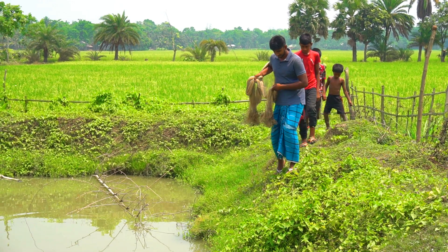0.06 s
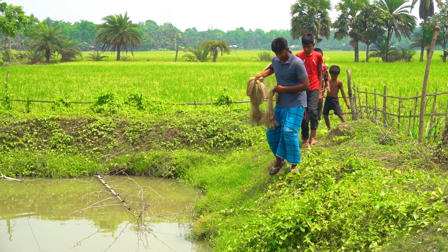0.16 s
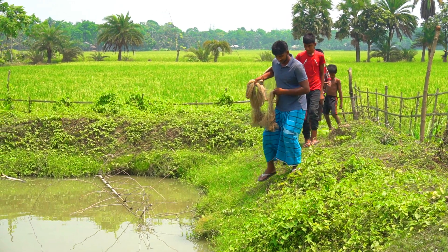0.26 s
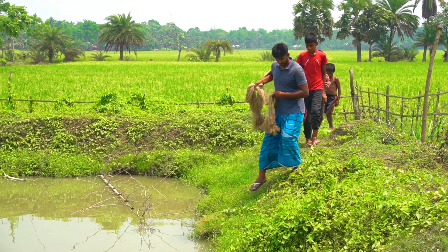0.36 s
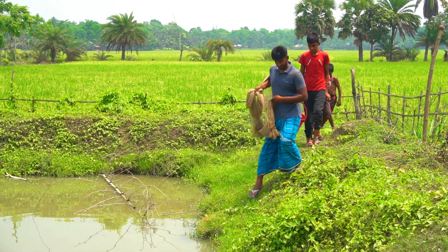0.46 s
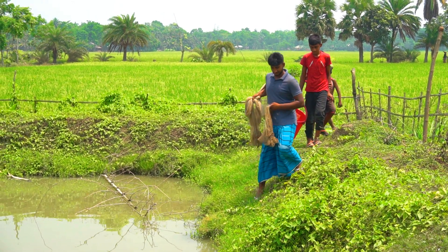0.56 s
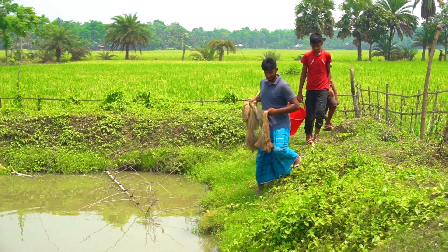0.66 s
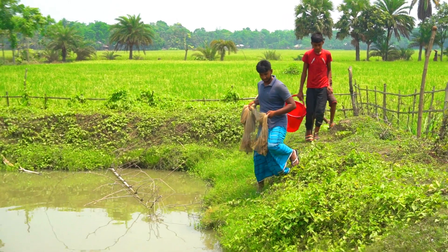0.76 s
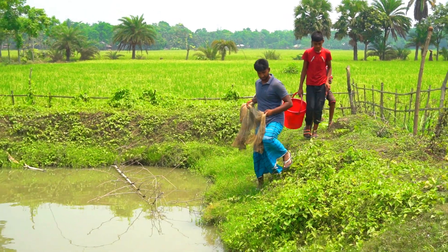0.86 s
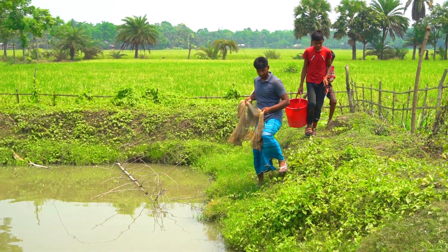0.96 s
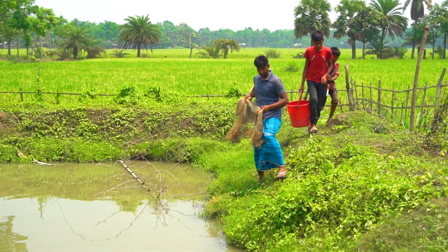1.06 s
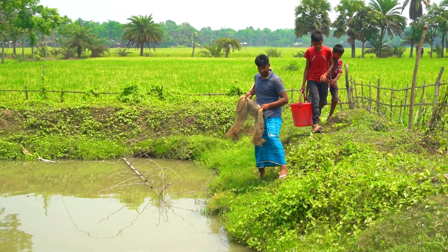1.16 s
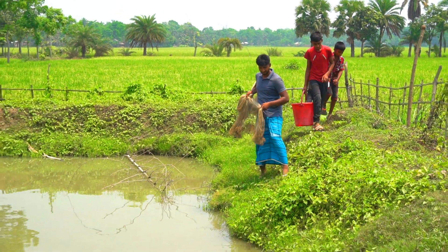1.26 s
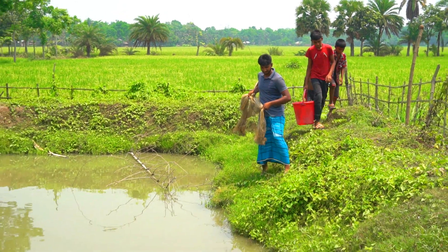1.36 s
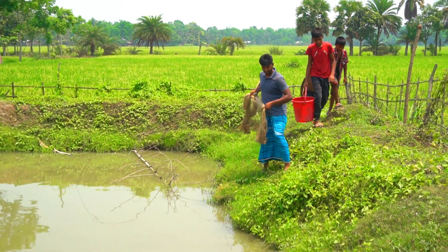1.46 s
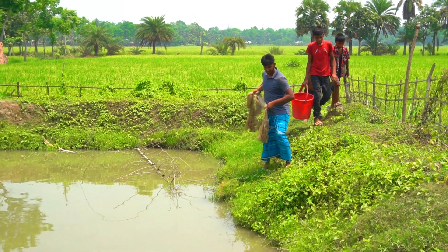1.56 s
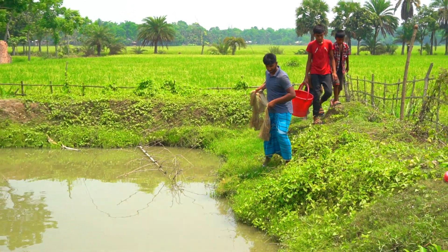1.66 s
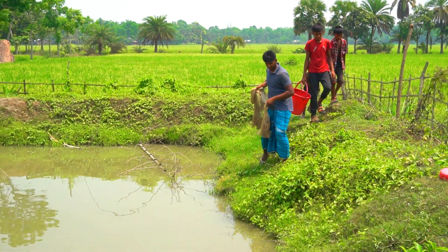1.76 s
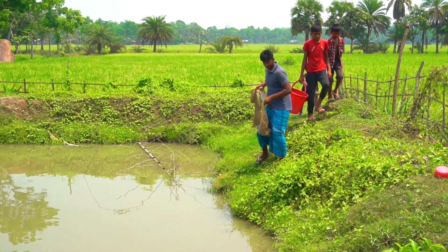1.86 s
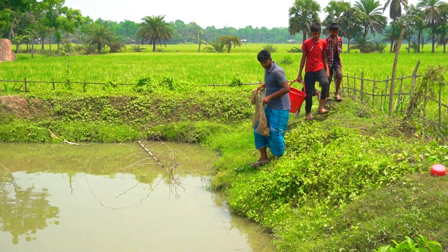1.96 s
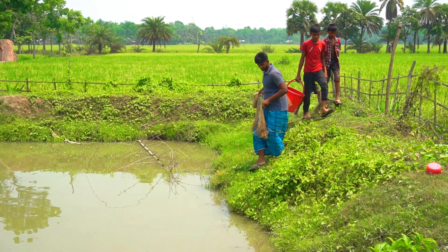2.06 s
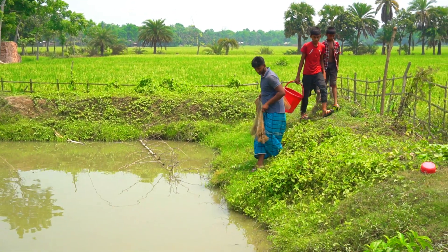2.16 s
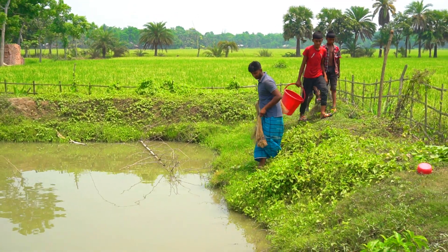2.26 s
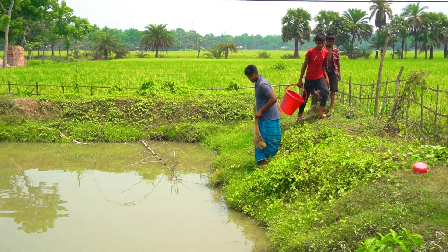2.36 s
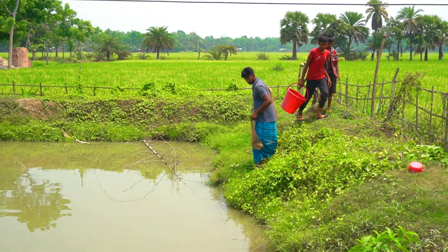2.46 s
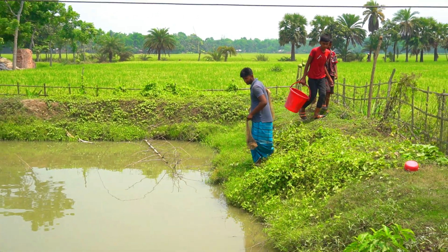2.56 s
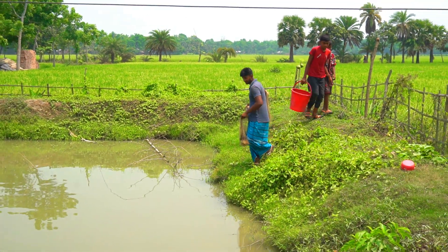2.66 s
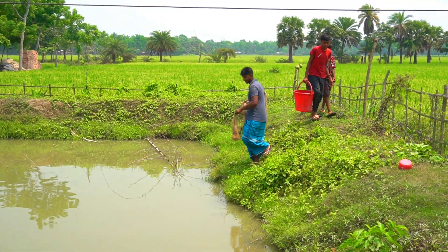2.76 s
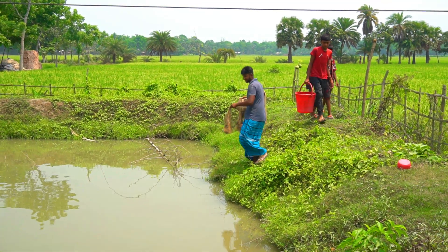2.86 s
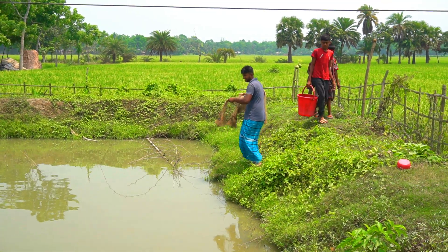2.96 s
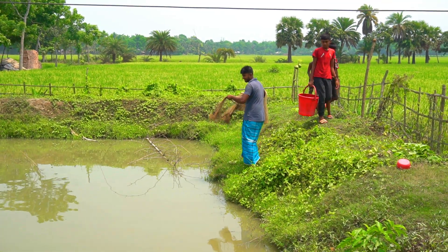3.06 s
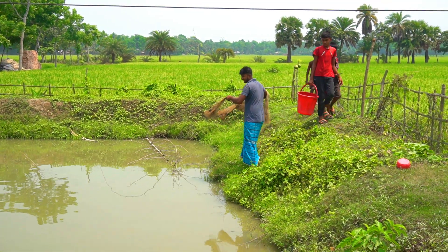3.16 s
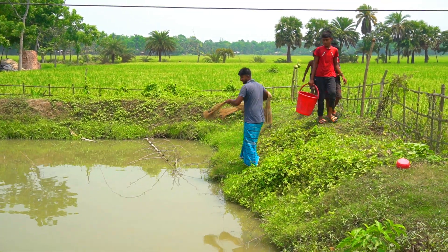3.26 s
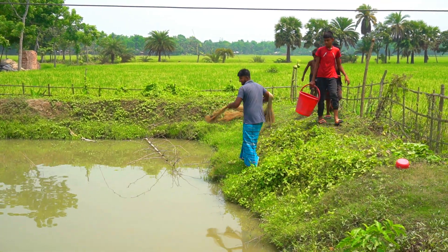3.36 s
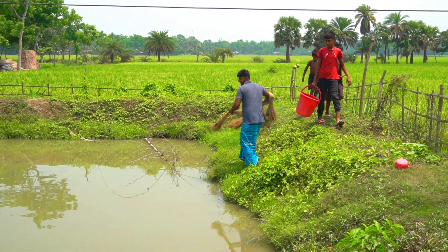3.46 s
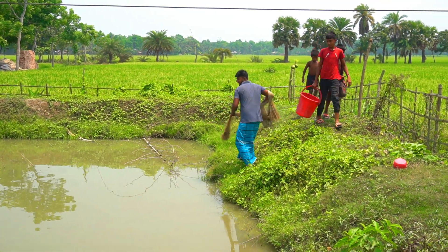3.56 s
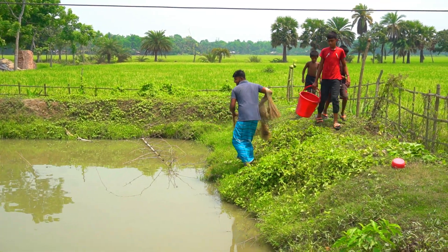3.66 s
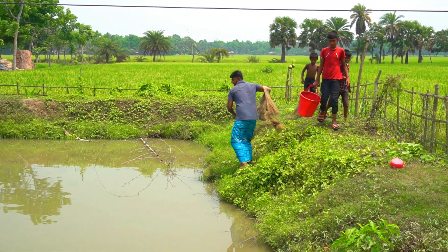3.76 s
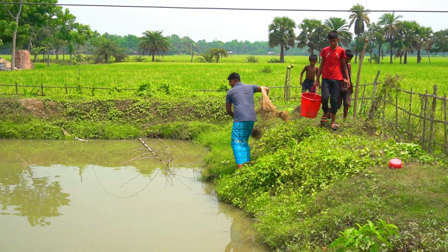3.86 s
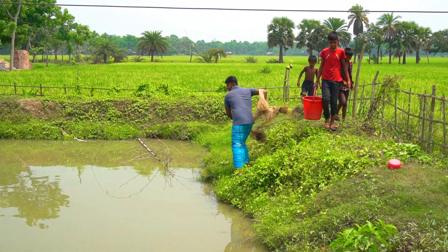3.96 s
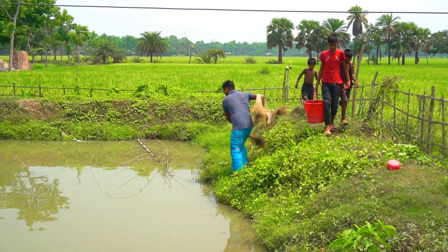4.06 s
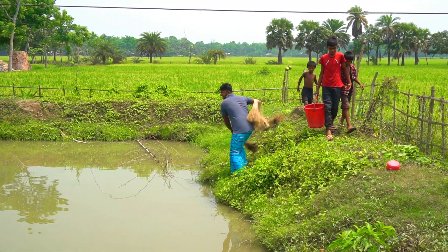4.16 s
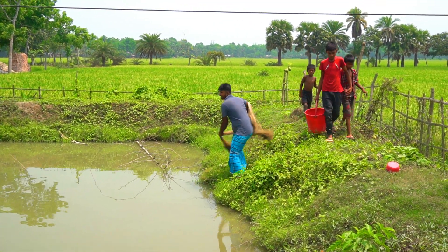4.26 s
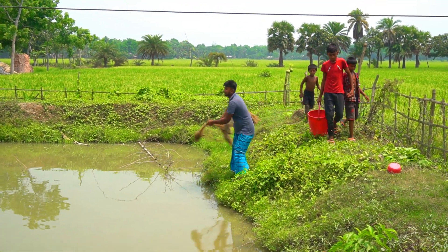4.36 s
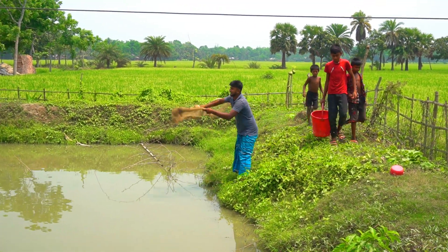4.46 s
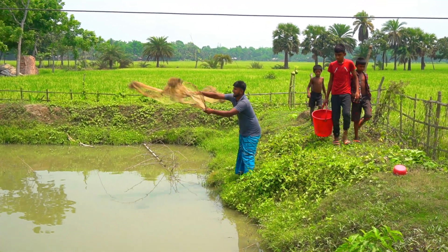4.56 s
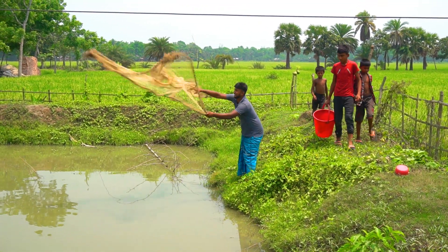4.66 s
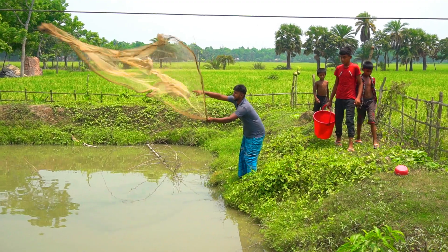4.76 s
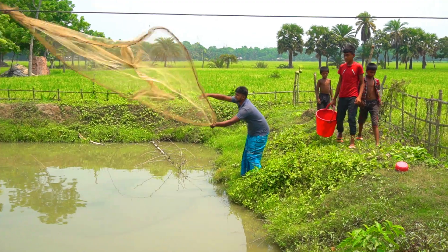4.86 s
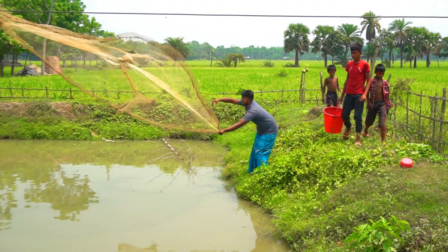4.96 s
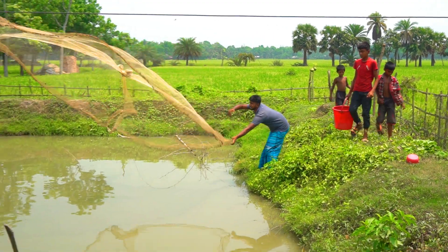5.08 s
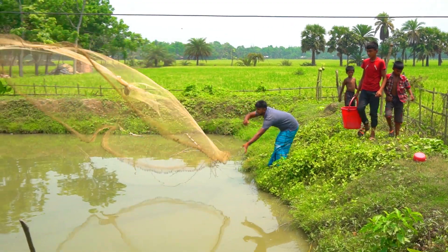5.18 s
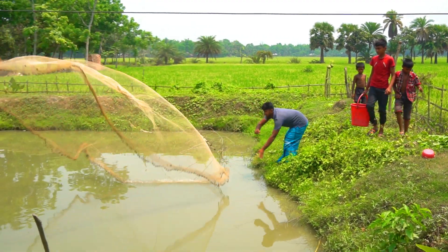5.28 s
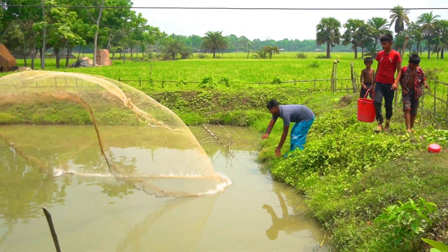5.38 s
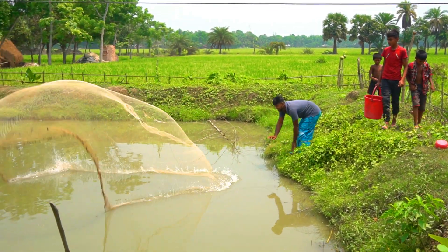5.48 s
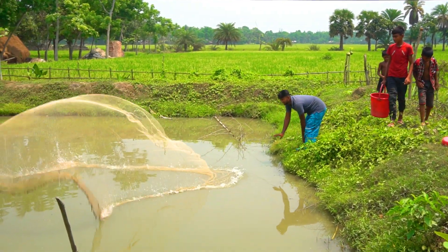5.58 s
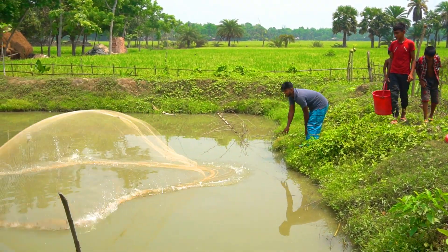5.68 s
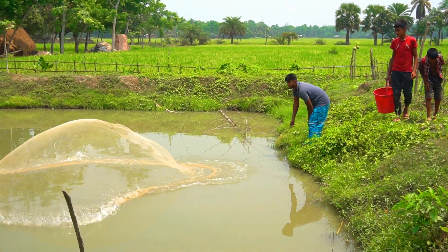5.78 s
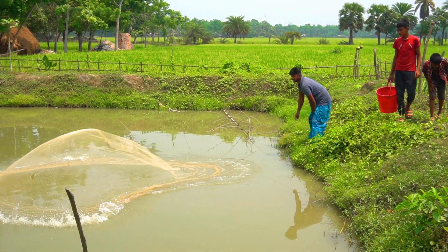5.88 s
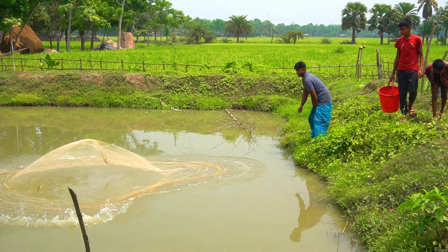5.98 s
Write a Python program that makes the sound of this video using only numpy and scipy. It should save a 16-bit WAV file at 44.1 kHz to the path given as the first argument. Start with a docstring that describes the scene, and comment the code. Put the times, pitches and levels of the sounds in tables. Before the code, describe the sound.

Quiet open air with a low gust fading to breeze and a thin, restless high hiss until about 3.7 s. From 0 to 1.5 s the hand-held camera's grip creaks and clicks close by; a clear bird whistle slides down around 0.3-0.6 s. Soft grass rustles, scuffs and faint sinker ticks follow, with a stronger rustle at 1.95 and a sharp dry snap at 2.02 s, echoed by smaller ones. Distant wavering bird notes come at 2.5-3.1 s. From 3.6 s another bird repeats rising pips four times a second, growing louder. The net bundle jerks at 3.8 s, a snap sounds at 4.35, then mesh hisses outward from 4.5 with bright ticks and more creaks until about 5.1. At 5.3 s the rim skims the water, then lands until 5.8 in rushing splatter, slaps, gurgling plops and spray. Smaller bubbles and falling drops fade quickly.

```python
"""A hand-held camera's grip creaks and a bird whistles, as a fisherman walks through grass to a pond.
Stalks or cord snap, then he swings a weighted cast net and throws it: filtered, crackling noise hisses
for the mesh and tiny puffs tick for the sinkers. The rim lands with noise slaps and spray, and with
ringing sine bubbles for the plops. Gliding sine notes are birds; soft noise is air, breeze and a high band."""
import sys
import numpy as np
from scipy import signal
from scipy.fft import rfft, irfft, next_fast_len
from scipy.io import wavfile
from scipy.ndimage import uniform_filter1d

SR = 44100
rng = np.random.default_rng(int(sys.argv[2]) if len(sys.argv) > 2 else 0)


def digitize_waveform(pressure):
    """Quantize a signal to 16-bit integers and store it at the path in sys.argv[1].

    Rows of a 2-D input are taken as channels; values are limited to [-1, 1].
    """
    field = np.atleast_2d(pressure).T
    bounded = np.clip(field, -1, 1)
    quanta = np.round(bounded * 32767).astype(np.int16)
    wavfile.write(sys.argv[1], SR, quanta)


N = 265658  # length in samples
T = np.arange(N) / SR  # time in seconds

# The rim lands from its first sinker (LAND) to its last (CLOSE); then the water calms.
LAND_S, CLOSE_S, LAND_ATTACK_S, CALM_DB_PER_S = 5.364, 5.814, 0.02, 97
SURGE_FALL_DB_PER_S = 302
# Whole stretches of the rim going in together. Each row: start in seconds, hold in seconds,
# splatter level in dB, spray level in dB, both against the steady landing.
SURGES = [(5.363, .004, 0.5, -21), (5.438, 0.014, -1, 3.5), (5.498, 0.098, -1, -5),
          (5.715, 0.019, -2.5, 0.5), (5.776, 0.0065, 3.5, -3.5), (5.876, 0.0056, -4, -13)]


def landing(axis):
    """How much water the rim throws up: steady while it lands, with surges (axis 0 splatter, 1 spray)."""
    steady = swell(LAND_S, CLOSE_S - LAND_S - LAND_ATTACK_S, 0, LAND_ATTACK_S, CALM_DB_PER_S)
    surges = [swell(s, hold, db[axis], LAND_ATTACK_S, SURGE_FALL_DB_PER_S) for s, hold, *db in SURGES]
    return together([steady] + surges)


# The near edge skims the surface first; levels are against the steady landing.
TOUCH_S, TOUCH_DB, SKIM_SPLATTER_DB = 5.303, -8.5, -11.5
# Drops falling back, against the steady landing; the spray is quieter again by its own dB.
SETTLE_DB, SETTLE_SPRAY_DB, SETTLE_FALL_DB_PER_S = -8, -7, 15
SPLATTER_DB, SPRAY_DB, THUMP_DB = -35.5, -37, -68.5
# Colour of the coarse splatter. Each row: frequency in Hz, level in dB.
SPLATTER_COLOUR = [(60, -29), (170, -27), (330, -19), (600, -16.5), (1100, 1.5), (1550, 6.5), (1850, 2),
                   (2300, 6), (3500, -2.5), (5000, -17), (9000, -47)]
# Colour of the fine spray. Each row: frequency in Hz, level in dB.
SPRAY_COLOUR = [(1500, -24), (3500, 0.5), (6000, 0), (9000, -4), (12000, -7.5), (16000, -11)]


def splash():
    """The rim lands stretch by stretch: plops, coarse splatter, a low thump and a fizz of fine spray."""
    hiss, impact = noise(POND, lead=0.48), landing(axis=0)
    settle = swell(CLOSE_S, 0, SETTLE_DB, LAND_ATTACK_S, SETTLE_FALL_DB_PER_S)
    skim = swell(TOUCH_S, 0, TOUCH_DB, attack_s=0.033, fall_db_per_s=56)
    churn = together([impact, settle, gain_of(SKIM_SPLATTER_DB) * skim])
    mist = together([landing(axis=1), skim, gain_of(SETTLE_SPRAY_DB) * settle])
    out = plops(impact, churn)
    splatter = coloured(crackle(hiss, per_s=1000, spread_db=2, life=0.0021), SPLATTER_COLOUR)
    out += gain_of(SPLATTER_DB) * churn * splatter
    fizz = patchy(noise(POND, lead=0.28), depth_db=1.5)
    spray = coloured(crackle(fizz, per_s=3500, spread_db=1.1, life=0.0014), SPRAY_COLOUR)
    out += panned(1.8) * gain_of(SPRAY_DB) * mist * spray
    out += gain_of(THUMP_DB) * impact * evened(band(hiss, 58, 150))
    return out


# Stretches of the weighted rim slapping down. Each row: start in seconds, relative level in dB,
# starting pitch of the air cavity in Hz.
SLAPS = [(5.379, -23, 1330), (5.448, -12.5, 808), (5.55, -12.5, 1580), (5.67, -15, 765), (5.684, -29, 750),
         (5.728, -13.5, 739), (5.768, -15, 823), (5.797, -11, 764), (5.803, -14, 868)]


def slaps():
    """Each stretch of rim hits the water with a puff of noise and a ringing air cavity."""
    hiss, out = noise(POND, lead=0.48), np.zeros((2, N))
    for s, db, hz in SLAPS:
        puff = burst(hiss, s + .3, life=0.027, rise=0.0014)
        add(out, s, gain_of(db - 15.5) * peaked(band(puff, 630, 2700)))
        add(out, s, gain_of(db - 7.5) * panned(0.62) * bubble(hz, cycles=7.7, climb=0.0133))
    return out


# The typical pocket pitch sags while the rim lands and rises afterwards.
POCKET_HZ, POCKET_SAG_HZ_PER_S, POCKET_RISE_HZ_PER_S = 834, 329, 1900
POCKET_DB, POCKET_GROWTH_DB_PER_S, POCKET_FALL_DB_PER_S = -38.5, 8.5, 54
# The largest pockets; the ratio is against the typical pitch.
GULP_RATIO, GULP_DB, GULP_GROWTH_DB_PER_S = .63, -58.5, 21
SMALL_BUBBLES_DB = -41


def plops(impact, churn):
    """Sinkers drag air under: pockets gurgle around one pitch, and smaller bubbles outlast them."""
    during, after = np.clip(T, LAND_S, CLOSE_S) - LAND_S, np.maximum(T - CLOSE_S, 0)
    hz = POCKET_HZ - POCKET_SAG_HZ_PER_S * during + POCKET_RISE_HZ_PER_S * after
    plunge = impact * gain_of(-POCKET_FALL_DB_PER_S * after)
    pocket_gain = gain_of(POCKET_DB + POCKET_GROWTH_DB_PER_S * during)
    pockets = pocket_gain * bubbles(hz, scatter=.165, cycles=5, count=560)
    gulp_gain = gain_of(GULP_DB + GULP_GROWTH_DB_PER_S * during)
    gulps = gulp_gain * bubbles(GULP_RATIO * hz, scatter=0.175, cycles=4.6, count=120)
    small = gain_of(SMALL_BUBBLES_DB) * bubbles(2.5 * hz, scatter=.36, cycles=9.3, count=700)
    return plunge * (pockets + gulps) + churn * small


def bubbles(typical_hz, scatter, cycles, count):
    """A cloud of bubbles of random size, level and side, from first touch to the end; level evened out."""
    out = np.zeros((2, N))
    for k, (size, loud, side) in enumerate(rng.standard_normal((count, 3))):
        at = np.interp((k + rng.random()) / count, [0, 1], [TOUCH_S, T[-1]])
        hz = np.interp(at, T, typical_hz) * np.exp(scatter * size)
        one = bubble(hz, cycles, climb=0.018)
        add(out, at, gain_of(5.8 * loud) * panned(4.0 * side) * one)
    power = uniform_filter1d((out ** 2).mean(0), size=1500)
    return out / np.sqrt(abs(power) + 1e-6)


def bubble(hz, cycles, climb, size=3000):
    """A trapped air pocket rings for some cycles and climbs in pitch as it nears the surface."""
    turns = hz * np.arange(size) / SR
    age = turns / cycles
    tone = np.sin(2 * np.pi * turns * (1 + climb * np.minimum(age, 4)))
    return tone * np.exp(-age) * (1 - np.exp(-turns * 2))


# The backswing jerks the bundled net once.
SWING_S, SWING_DB, SWING_ATTACK_S, SWING_FALL_DB_PER_S = 3.762, -44, 0.02, 152
# Colour of the bundled net on the backswing. Each row: frequency in Hz, level in dB.
SWING_COLOUR = [(450, -27), (1100, -20), (2600, -0.5), (4000, -8), (7600, -9), (16000, -15.5)]
SWISH_ATTACK_S = 0.028
# The mesh is shaken out, swung, then runs through the air.
# Each row: start in seconds, hold in seconds, relative level in dB, fall in dB per second.
SWISHES = [(2.796, 0.014, -66, 80), (3.05, .15, -71.5, 67), (3.213, 0.064, -65.5, 160),
           (4.015, 0.13, -64, 80), (4.228, 0.1, -57, 61), (4.488, 0.035, -58.5, 100),
           (4.604, .32, -50.5, 60)]
# Colour of the mesh in the air. Each row: frequency in Hz, level in dB.
FLIGHT_COLOUR = [(800, -17.5), (1500, 2), (3500, -2.5), (5500, 1.5), (9000, 6), (13000, 2.5), (16000, -3)]


def net():
    """The bundled mesh is jerked back, then its many threads hiss through the air."""
    hiss = patchy(noise(NEAR), depth_db=1.8)
    bundle = crackle(hiss, per_s=2000, spread_db=3, life=.002)
    threads = crackle(hiss, per_s=2600, spread_db=3, life=.001)
    jerk = swell(SWING_S, 0, SWING_DB, SWING_ATTACK_S, SWING_FALL_DB_PER_S)
    mesh = together(swell(s, hold, db, SWISH_ATTACK_S, fall) for s, hold, db, fall in SWISHES)
    out = panned(-4) * jerk * coloured(bundle, SWING_COLOUR)
    return out + gain_of(1.5) * mesh * coloured(threads, FLIGHT_COLOUR)


# Sinkers ticking together. Each row: start in seconds, relative level in dB.
TICKS = [(0.851, -40.5), (1.4458, -45), (1.568, -41.5), (1.702, -46.5), (1.84, -42), (2.3472, -36.5),
         (4.2366, -31.5), (4.271, -31.5), (4.6115, -22.5), (4.6757, -27), (4.6874, -25.5), (4.7815, -26.5),
         (4.8393, -26.5), (4.907, -37), (4.92, -25), (4.9552, -27.5)]


def sinkers():
    """Small weights knock together: very short, bright puffs, each with a fainter, longer tail."""
    hiss, out = patchy(noise(NEAR), depth_db=1.8), np.zeros((2, N))
    for s, db in TICKS:
        tick = burst(hiss, s, life=.001) + .13 * burst(hiss, s + .1, life=.014)
        add(out, s, gain_of(db - 2.5) * panned(-.8) * peaked(band(tick, 6340, 13900)))
    return out


STRIDE_ATTACK_S, STRIDE_FALL_DB_PER_S = 0.1, 53
# Strides through the grass. Each row: start in seconds, hold in seconds, level in dB.
STRIDES = [(.54, 0.2, -63), (1.203, .25, -64.5), (1.797, .05, -64.5), (1.938, 0.057, -50.5),
           (2.188, 0.025, -56)]
WALK_S, WALK_DB = 2.94, -71  # a faint rustle lasts as long as the walk
# Colour of grass brushed by legs. Each row: frequency in Hz, level in dB.
RUSTLE_COLOUR = [(450, -7.5), (760, -1.5), (1400, -4.5), (2200, 5), (3200, 2), (4300, 0), (5500, -0.5),
                 (10000, -2), (16000, -10)]
BRUSH_ATTACK_S, BRUSH_FALL_DB_PER_S = .06, 100
# Cloth sliding past tall leaves. Each row: start in seconds, level in dB.
BRUSHES = [(1.27, -54), (1.485, -52)]


def grass():
    """Legs and cloth brush the grass: noise broken into many tiny contacts with the blades."""
    blades = crackle(patchy(noise(NEAR), depth_db=1.8), per_s=2000, spread_db=3, life=.002)
    steps = STRIDES + [(0.0098, WALK_S, WALK_DB)]
    legs = together(swell(*row, STRIDE_ATTACK_S, STRIDE_FALL_DB_PER_S) for row in steps)
    cloth = together(swell(s, 0, db, BRUSH_ATTACK_S, BRUSH_FALL_DB_PER_S) for s, db in BRUSHES)
    out = panned(-1.44) * legs * coloured(blades, RUSTLE_COLOUR)
    return out + cloth * evened(band(blades, 1870, 3420))


# Soft scuffs on the bank. Each row: start in seconds, relative level in dB, centre frequency in Hz.
SCUFFS = [(1.236, -40.5, 910), (1.721, -40.5, 1350), (1.836, -40, 1040), (2.333, -43, 695),
          (2.414, -44.5, 720), (2.457, -45.5, 393), (2.488, -43.5, 636), (2.524, -54.5, 594),
          (2.567, -53.5, 420), (2.636, -39.5, 766), (2.763, -46.5, 1060), (2.833, -49, 716),
          (3.017, -41, 1420)]


def scuffs():
    """Feet press grass and soft earth: dull, grainy puffs."""
    hiss, out = crackle(noise(NEAR), per_s=700, spread_db=3.5, life=0.0021), np.zeros((2, N))
    for s, db, hz in SCUFFS:
        puff = band(burst(hiss, s, life=0.03, rise=0.00079), hz * 0.38, hz * 2.05, order=3)
        add(out, s, gain_of(db - 2.5) * peaked(puff))
    return out


# Dry snaps of stalks and cord. Each row: start in seconds, relative level in dB.
SNAPS = [(1.963, -37), (2.0208, -17), (2.077, -27.5), (2.119, -36.5), (3.189, -46), (4.354, -27)]
# Colour of the snaps. Each row: frequency in Hz, level in dB.
SNAP_COLOUR = [(200, -38), (480, -21), (750, 6.5), (1400, 2), (2300, 7.5), (3700, -3), (6000, -7.5),
               (16000, -19.5)]


def snaps():
    """Short, broad cracks with a brief rustle behind each."""
    hiss, out = coloured(noise(NEAR), SNAP_COLOUR), np.zeros((2, N))
    for s, db in SNAPS:
        crack = burst(hiss, s, life=0.0021, rise=0.0013) + 0.06 * burst(hiss, s + .1, life=0.015)
        add(out, s, gain_of(db - 2.0) * panned(-1.8) * peaked(crack))
    return out


# Creaks of the grip. Each row: start in seconds, relative level in dB, low ring against high in dB
# (before a trim).
CREAKS = [(0.059, -48, 15), (0.116, -42.5, 4), (0.172, -46.5, 4), (0.227, -33.5, 3.5), (0.299, -43.5, 16),
          (0.545, -33.5, -25), (0.569, -38, -6), (0.628, -37, -5), (0.67, -33.5, -14), (0.689, -34, -6),
          (0.706, -35, -21), (0.751, -32.5, 2), (0.779, -36, -8), (0.837, -36.5, 21), (0.891, -43, 15),
          (0.932, -38.5, -1), (0.945, -39, -17), (0.97, -38, -3), (1.051, -43, -14), (1.406, -34.5, -17),
          (1.503, -37, -25), (4.399, -41.5, -31), (4.443, -46, -3), (4.79, -24.5, -18.5), (4.813, -36, -12),
          (4.861, -33.5, -16), (4.928, -33.5, -30), (5.049, -31, -35), (5.068, -39, -31)]
# Low ringing pitches of the camera shell. Each row: frequency in Hz, level in dB,
# time to fall by 60 dB in seconds.
SHELL_LOW = [(640, -9, 0.0055), (898, 13, 0.023), (1020, -3, 0.074)]
# High ringing pitches of the camera shell. Each row: frequency in Hz, level in dB,
# time to fall by 60 dB in seconds.
SHELL_HIGH = [(1343, 2.5, 0.027), (1990, 11, 0.026), (2088, 5, 0.023), (2360, -25, 0.0054)]
# Colour of the fine creaking. Each row: frequency in Hz, level in dB.
STRAIN_COLOUR = [(100, -24), (280, -6), (520, -4), (720, 4.5), (900, 6), (1190, -2.5), (1430, 1),
                 (1720, -4.5), (2010, 3.5), (2650, -7), (3100, -15), (6000, -18.5), (12000, -76)]


def grip():
    """Stick and slip of the grip: single slips ring the shell, over a fine creaking."""
    hiss, out = noise(NEAR, lead=0.63), np.zeros((2, N))
    for s, db, low_db in CREAKS:
        push = burst(hiss, s, life=.0022) + .06 * burst(hiss, s + .1, life=.008)
        body = peaked(ring(push, SHELL_HIGH) + gain_of(low_db + 6.0) * ring(push, SHELL_LOW))
        add(out, s, gain_of(db + 1) * panned(-4.0) * peaked(band(body, 300, 2840, order=3)))
    fine = coloured(crackle(hiss, per_s=420, spread_db=3.8, life=.0024), STRAIN_COLOUR)
    return out + gain_of(-2.5) * panned(-2.0) * fine * strain()


def ring(push, modes):
    """Rings a set of modes, each slightly and randomly detuned at every blow."""
    t = np.arange(push.shape[1]) / SR
    answer = np.zeros(len(t))
    for hz, db, t60 in modes:
        answer += gain_of(db - 60 * t / t60) * np.cos(2 * np.pi * hz * rng.normal(1, .03) * t)
    return peaked(signal.fftconvolve(push, answer[None], axes=1)[:, :len(t)])


STRAIN_ATTACK_S, STRAIN_FALL_DB_PER_S = 0.038, 75
# Spells when the grip is under strain. Each row: start in seconds, hold in seconds, relative level in dB.
STRAINS = [(0.0, 0.14, -57), (0.162, 0.46, -52), (0.54, 0.41, -48), (1.248, 0.26, -50.5),
           (2.03, 0.042, -55), (4.336, 0.028, -60), (4.748, 0.31, -47.5)]


def strain():
    """How hard the grip is strained; drives its fine creaking and the handling rumble."""
    return together(swell(*row, STRAIN_ATTACK_S, STRAIN_FALL_DB_PER_S) for row in STRAINS)


# A clear whistle slides from a high pitch down to a lower one, which is held softly.
WHISTLE_S, WHISTLE_HOLD_S, WHISTLE_DB = 0.32, 0.05, -47.5
WHISTLE_ATTACK_S, WHISTLE_FALL_DB_PER_S = 0.071, 170
LOW_HOLD_S, LOW_DB = 0.095, -57
WHISTLE_HIGH_HZ, WHISTLE_LOW_HZ, SLIDE_AT_S, SLIDE_S = 1627, 1466, .443, 0.045


def near_bird():
    """One near, pure whistle: a sliding sine with a faint echo."""
    slide = (1 + np.tanh((T - SLIDE_AT_S) / SLIDE_S)) / 2
    hz = WHISTLE_HIGH_HZ + (WHISTLE_LOW_HZ - WHISTLE_HIGH_HZ) * slide
    parts = [(WHISTLE_S, WHISTLE_HOLD_S, WHISTLE_DB), (SLIDE_AT_S, LOW_HOLD_S, LOW_DB)]
    effort = together(swell(*part, WHISTLE_ATTACK_S, WHISTLE_FALL_DB_PER_S) for part in parts)
    near = panned(-5.5) * effort * np.sqrt(2) * np.sin(2 * np.pi * np.cumsum(hz) / SR)
    return near + gain_of(-14) * field(near, t60=.4)


# A distant warbler's notes. Each row: start in seconds, length in seconds, relative level in dB,
# start pitch in Hz, end pitch in Hz (the pitch wavers around this line).
NOTES = [(0.0, 0.054, -64.5, 4520, 3320), (2.458, .085, -59.5, 3560, 2974), (2.572, 0.074, -63, 3700, 3820),
         (2.691, 0.05, -56.5, 3490, 3570), (2.796, 0.048, -56, 3400, 3680), (2.89, 0.077, -60, 3180, 3280),
         (3.009, .063, -63.5, 2584, 2860)]


def far_birds():
    """Farther notes: gliding sines that waver in pitch and are blurred by echoes."""
    far = np.zeros((2, N))
    for s, length, db, start_hz, end_hz in NOTES + list(pips()):
        u = np.linspace(0, 1, round(length * SR))
        wobble = evened(uniform_filter1d(rng.standard_normal(8000), size=90))
        pitch = (start_hz + (end_hz - start_hz) * u) * (1 + .03 * np.resize(wobble, len(u)))
        shape = np.sqrt(2 * abs(np.sin(np.pi * u)))
        add(far, s, gain_of(db) * shape * np.sin(2 * np.pi * np.cumsum(pitch) / SR)[None])
    return gain_of(-3.0) * far + gain_of(1.5) * field(far, t60=0.24)


# Another bird repeats one rising pip, growing louder and higher as it warms up.
PIP_S, PIP_EVERY_S, PIP_LENGTH_S, PIP_GLIDE_HZ = 3.588, .257, 0.1236, 89
PIP_HZ, PIP_DB, PIP_FIRST_LOWER_HZ, PIP_FIRST_SOFTER_DB, PIP_WARMUP_S = 2580, -49.5, 441, 18, .55
PIP_PITCH_HASTE = 1.504  # the pitch settles this many times faster than the level


def pips(count=7):
    """Evenly spaced notes that settle towards their full pitch and level."""
    for age in PIP_EVERY_S * np.arange(count):
        cold = np.exp(-age / PIP_WARMUP_S)
        hz = PIP_HZ - PIP_FIRST_LOWER_HZ * cold ** PIP_PITCH_HASTE
        yield PIP_S + age, PIP_LENGTH_S, PIP_DB - PIP_FIRST_SOFTER_DB * cold, hz, hz + PIP_GLIDE_HZ


def field(x, t60, size=30000):
    """Scattered echoes from trees and banks: a fading noise tail, different on each side."""
    tail = rng.standard_normal((2, size)) * np.exp(-np.log(1000) * np.arange(size) / SR / t60)
    return signal.fftconvolve(x, tail / np.linalg.norm(tail[0]), axes=1)[:, :N]


HIGH_BAND_ATTACK_S, HIGH_BAND_FALL_DB_PER_S = 0.1, 100
# Levels of a thin, high noise band: faint, then stronger, then fading out.
# Each row: start in seconds, hold in seconds, level in dB.
HIGH_BAND_LEVELS = [(0.0, 1.2, -70.5), (1.3, 2.25, -65)]


def high_band():
    """A thin, restless band of high noise, whose small regions of pitch swell and sink."""
    level = together(swell(*row, HIGH_BAND_ATTACK_S, HIGH_BAND_FALL_DB_PER_S) for row in HIGH_BAND_LEVELS)
    hiss = patchy(rng.standard_normal((2, N)), depth_db=6)
    return level * evened(band(hiss, 3780, 4800, order=3))


# A gust dies down to a steady breeze; strain on the grip rumbles too (dB against the strain level).
GUST_DB, GUST_FALL_DB_PER_S, BREEZE_DB, HANDLING_RUMBLE_DB = -67, 5.5, -81, -26


def rumble():
    """Low noise from the breeze and from handling the grip."""
    wind = np.hypot(gain_of(GUST_DB - GUST_FALL_DB_PER_S * T), gain_of(BREEZE_DB))
    level = together([wind, gain_of(HANDLING_RUMBLE_DB) * strain()])
    return level * evened(band(noise(POND), 59.4, 131.4))


# Colour of the still air over the fields. Each row: frequency in Hz, level in dB.
AIR = [(25, -33), (60, -19.5), (100, -2.5), (170, -14.5), (300, -10), (600, -14), (1000, -11),
       (1600, -16.5), (2400, 2.5), (3200, -7.5), (6000, -14), (10000, -19.5), (16000, -25)]


def still_air():
    """Quiet open air: soft noise whose small regions of pitch swell and sink."""
    return gain_of(-68.5) * coloured(patchy(noise(NEAR), depth_db=5.5), AIR)


# How alike left and right are for sounds close by and for the air.
# Each row: frequency in Hz, likeness from 0 to 1.
NEAR = [(100, 0.99), (800, 0.66), (2000, 0.51), (4000, 0.23), (8000, 0.51), (16000, 0.35)]
# How alike left and right are for the pond and the rumble. Each row: frequency in Hz, likeness from 0 to 1.
POND = [(100, 1), (900, 0.84), (2000, 0.99), (3000, 0.65), (6000, 0.52), (16000, 0.43)]


def noise(likeness, lead=0.):
    """White noise, partly shared by both sides; left leads by a phase (radians at 1 kHz)."""
    size = next_fast_len(N)
    hz = np.fft.rfftfreq(size, 1 / SR)
    a, b = rfft(rng.standard_normal((2, size)))
    same = np.clip(read(likeness, hz), -1, 1)
    delay = np.exp(-1j * lead * np.sqrt(hz / 1000))
    right = (same * a + np.sqrt(1 - same ** 2) * b) * delay
    return irfft(np.array([a, right]))[:, :N]


def patchy(x, depth_db, size=512):
    """Lets small regions of pitch and time swell and sink; rms 1."""
    z = signal.stft(x, nperseg=size)[2]
    patches = uniform_filter1d(rng.standard_normal(z.shape[1:]), size=9, axis=0)
    patches = uniform_filter1d(patches, size=10, axis=1)
    return evened(signal.istft(z * gain_of(depth_db * evened(patches)), nperseg=size)[1][:, :N])


def crackle(hiss, per_s, spread_db, life):
    """Breaks hiss into tiny bursts of random size that die away over life seconds; slow level evened."""
    sizes = gain_of(spread_db * np.minimum(rng.exponential(1, N), 4)) * (rng.random(N) < per_s / SR)
    power = signal.lfilter([1], [1, -np.exp(-2 / (life * SR))], sizes ** 2) + 1e-9
    return hiss * np.sqrt(power / (abs(uniform_filter1d(power, size=3000)) + 1e-9))


def burst(hiss, s, life, rise=0.00035, size=5000):
    """A short puff cut from hiss at s seconds: quick rise, exponential fall."""
    t = np.arange(size) / SR
    piece = hiss.take(np.arange(size) + round(s * SR), axis=1, mode="wrap")
    return piece * (1 - np.exp(-t / rise)) * np.exp(-t / life)


def coloured(x, points, size=2048):
    """Filters with the given spectrum, without sounding early (minimum phase); rms 1."""
    db = np.maximum(read(points, abs(np.fft.fftfreq(size, 1 / SR))), -100)
    log_gain = np.log(gain_of(db))
    taps = np.fft.ifft(np.exp(np.conj(signal.hilbert(log_gain)))).real
    return evened(signal.oaconvolve(x, taps[None, :size // 2], axes=1)[:, :x.shape[1]])


def band(x, low_hz, high_hz, order=2):
    """Keeps the frequencies between two limits."""
    edges = [low_hz, min(high_hz, SR / 2 - 1000)]
    return signal.sosfilt(signal.butter(order, edges, "band", fs=SR, output="sos"), x)


def swell(s, hold_s, db, attack_s, fall_db_per_s):
    """Envelope: a straight rise, a hold, an exponential fall."""
    t = T - s
    fall_db = fall_db_per_s * np.maximum(t - attack_s - hold_s, 0)
    return np.clip(t / attack_s, 0, 1) * gain_of(db - fall_db)


def together(envelopes):
    """Level of unrelated sounds heard at once: their powers add."""
    return np.linalg.norm(list(envelopes), axis=0)


def gain_of(db):
    """Decibels to a factor."""
    return 10 ** (np.asarray(db) / 20)


def evened(x):
    """Scales to rms 1."""
    return x / np.sqrt(np.mean(x ** 2) + 1e-20)


def peaked(x):
    """Scales so that the mean of both channels peaks at 1."""
    return x / abs(x.mean(0)).max()


def read(points, hz):
    """Reads a spectrum on a log-frequency axis."""
    f, value = np.transpose(points)
    return np.interp(np.log(hz + 1), np.log(f + 1), value)


def panned(db):
    """Gains of left and right, db apart; positive is left."""
    return gain_of(np.array([[db], [-db]]) / 2)


def add(mix, s, sound):
    """Mixes a sound in at s seconds."""
    part = mix[:, max(round(s * SR), 0):][:, :sound.shape[1]]
    part += sound[:, :part.shape[1]]


def scene():
    """Everything at the pond."""
    cast = splash() + slaps() + net() + sinkers()
    walk = grass() + scuffs() + snaps() + grip()
    background = near_bird() + far_birds() + high_band() + rumble() + still_air()
    return cast + walk + background


EDGE_HZ = 16000


def record(dry):
    """Limits the treble with a steep low-pass filter at EDGE_HZ."""
    taps = signal.firwin(511, EDGE_HZ, window=("kaiser", 9), fs=SR)
    return signal.oaconvolve(dry, taps[None], "same")


dry = scene()
out = record(dry)
digitize_waveform(out)
```